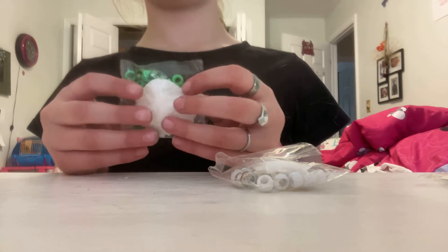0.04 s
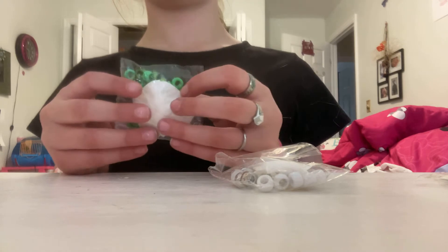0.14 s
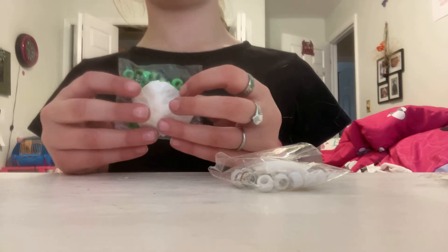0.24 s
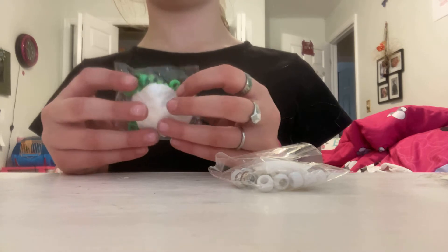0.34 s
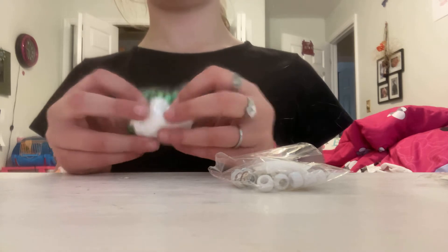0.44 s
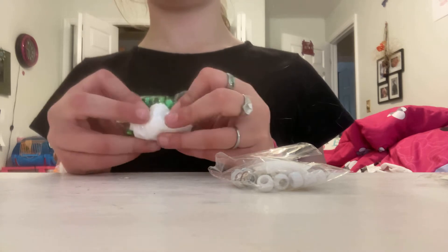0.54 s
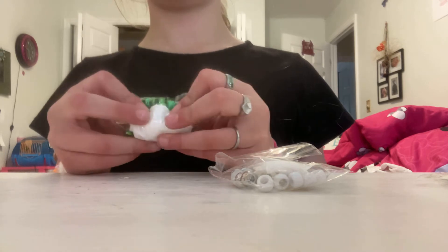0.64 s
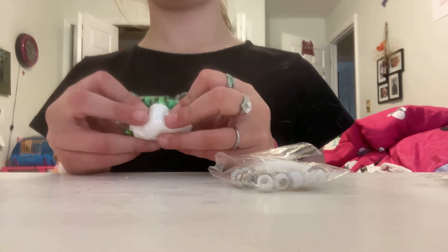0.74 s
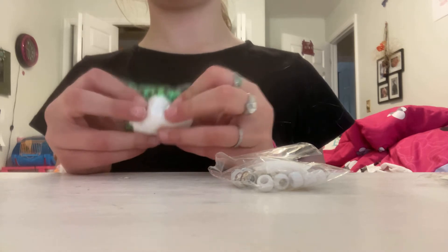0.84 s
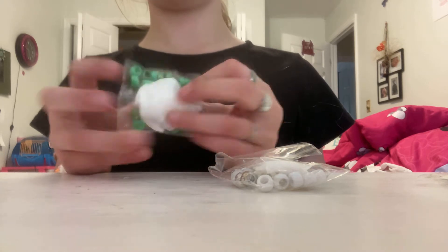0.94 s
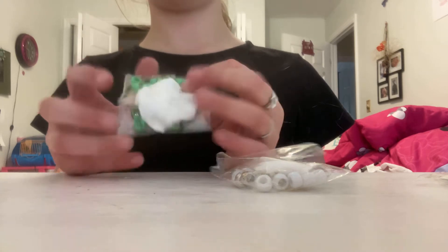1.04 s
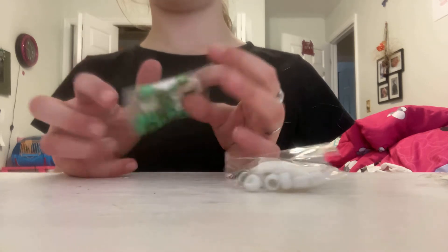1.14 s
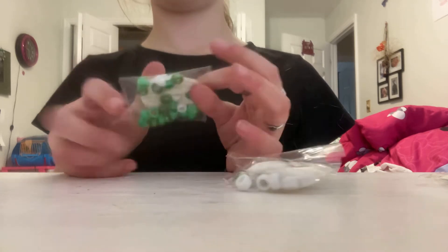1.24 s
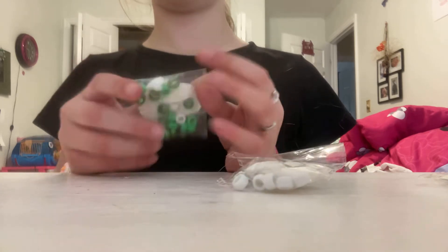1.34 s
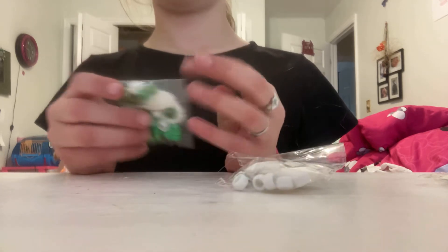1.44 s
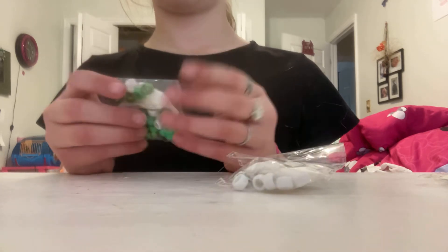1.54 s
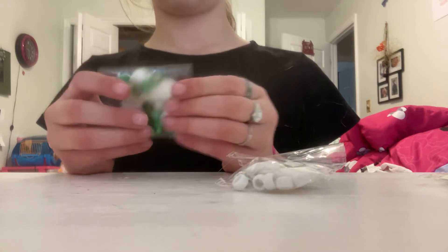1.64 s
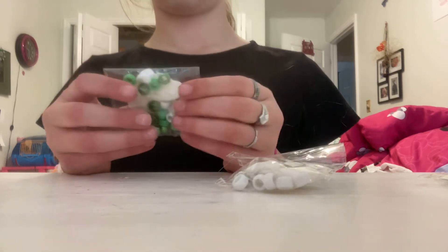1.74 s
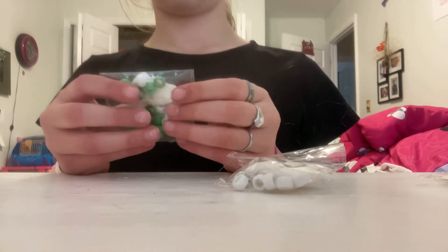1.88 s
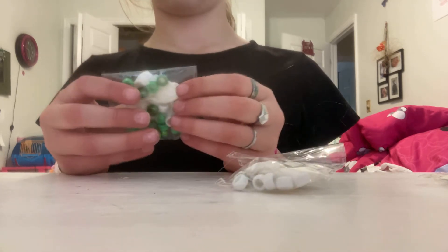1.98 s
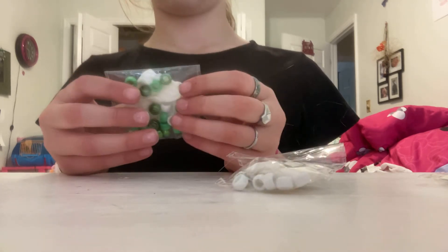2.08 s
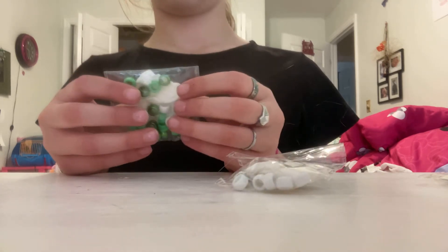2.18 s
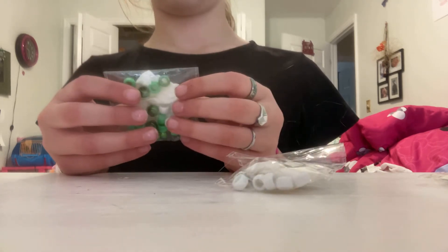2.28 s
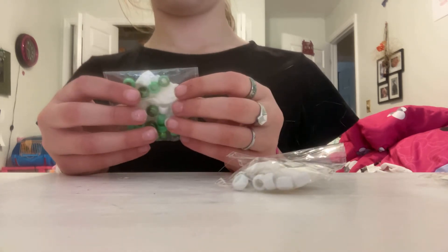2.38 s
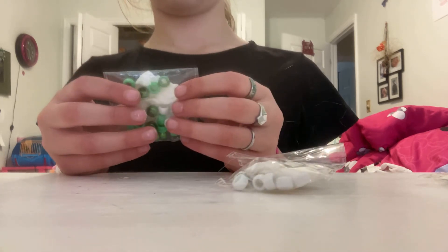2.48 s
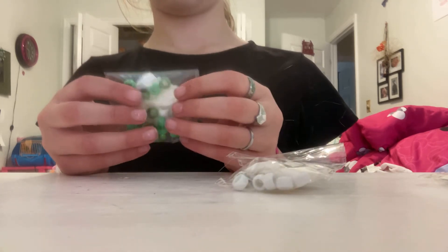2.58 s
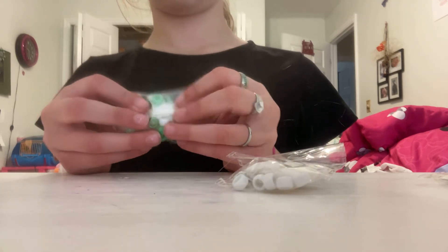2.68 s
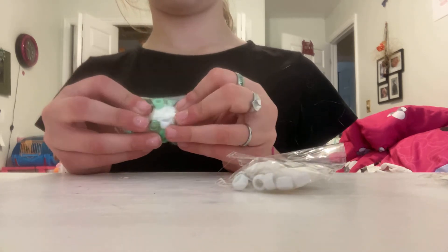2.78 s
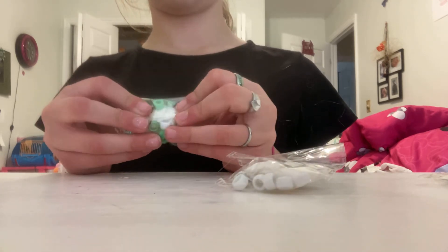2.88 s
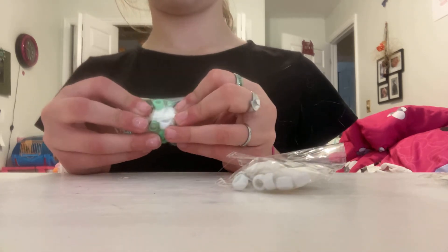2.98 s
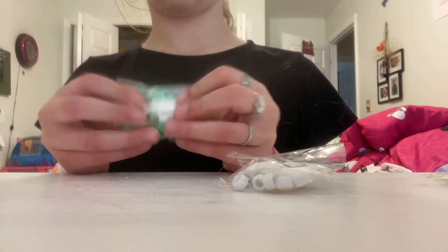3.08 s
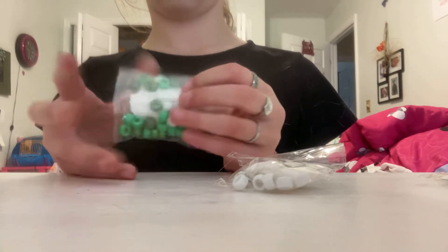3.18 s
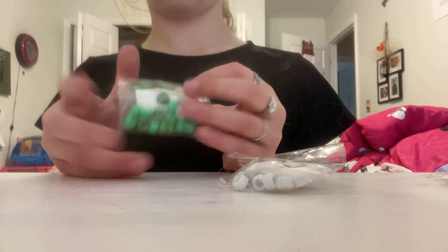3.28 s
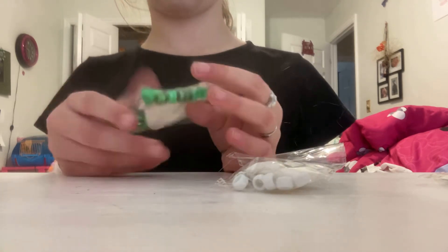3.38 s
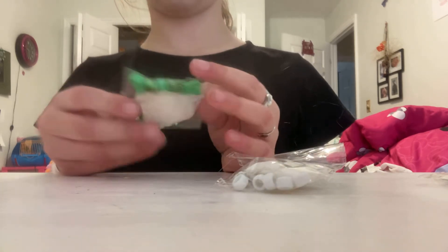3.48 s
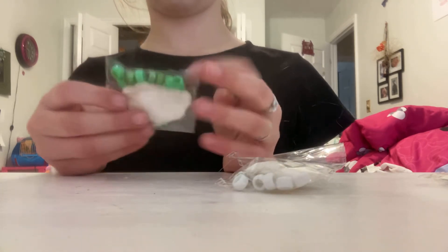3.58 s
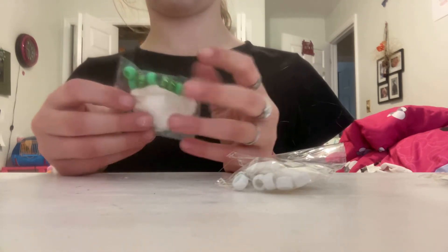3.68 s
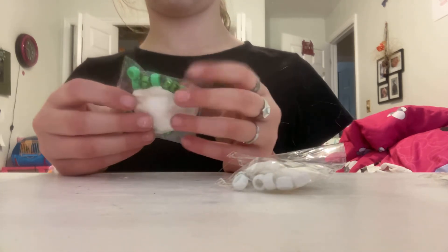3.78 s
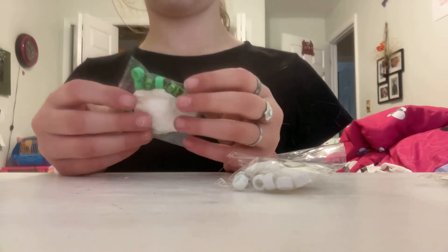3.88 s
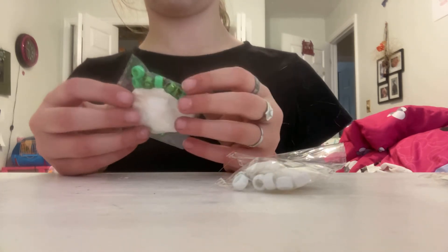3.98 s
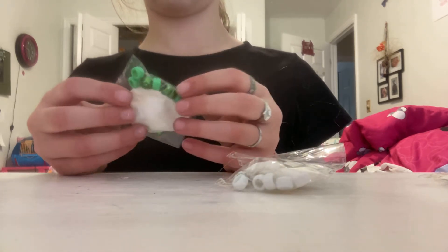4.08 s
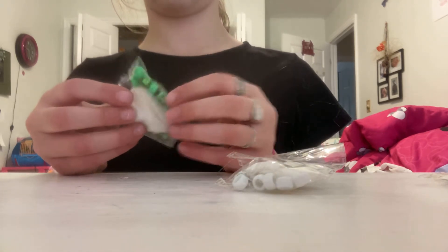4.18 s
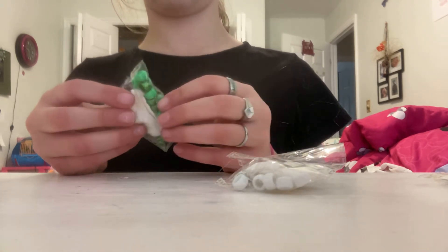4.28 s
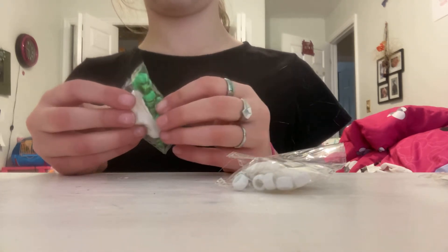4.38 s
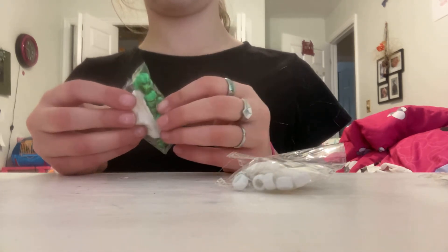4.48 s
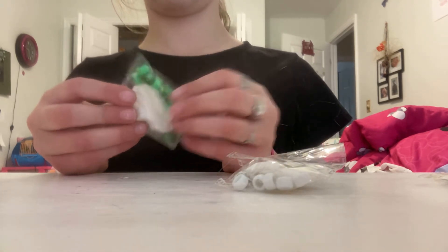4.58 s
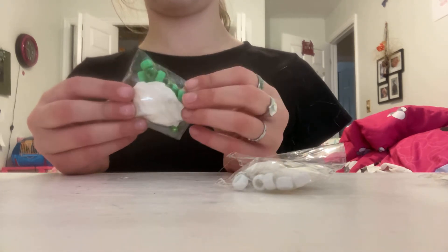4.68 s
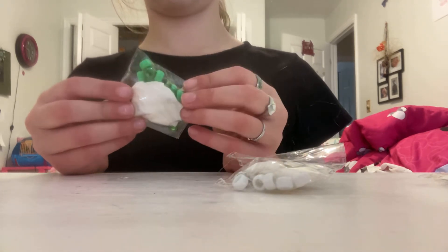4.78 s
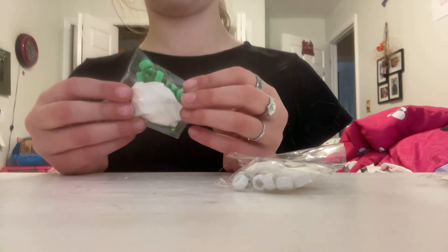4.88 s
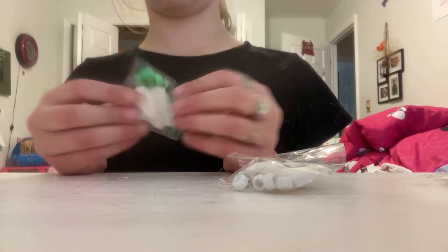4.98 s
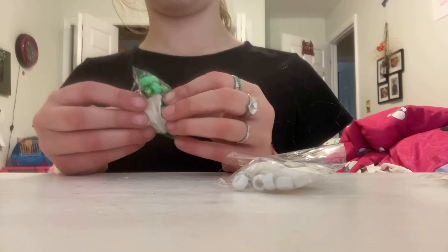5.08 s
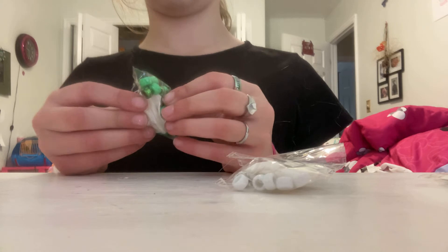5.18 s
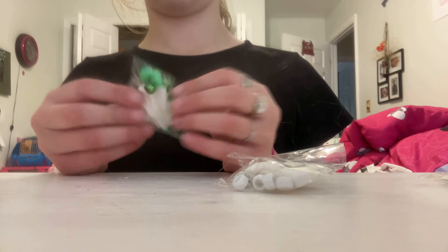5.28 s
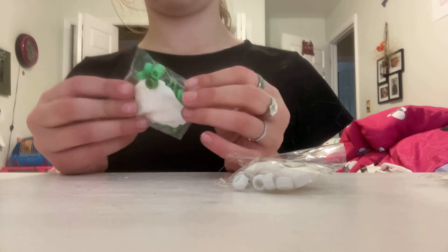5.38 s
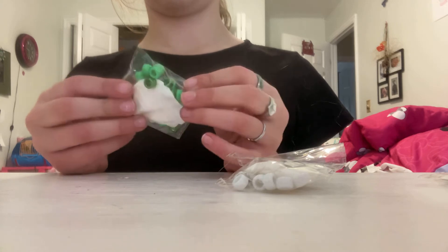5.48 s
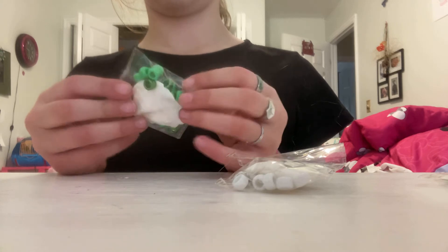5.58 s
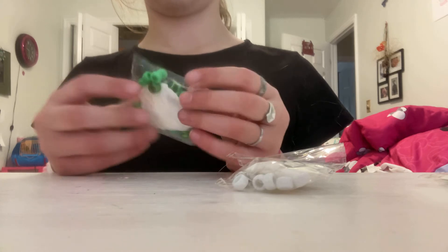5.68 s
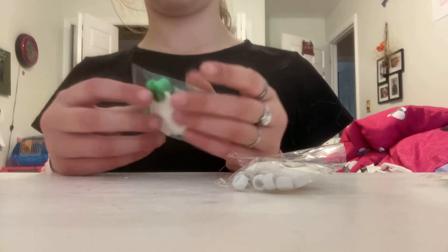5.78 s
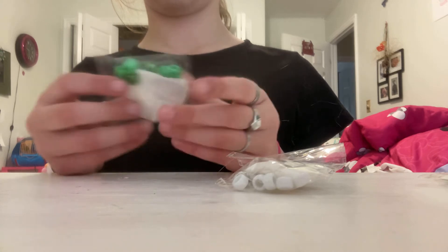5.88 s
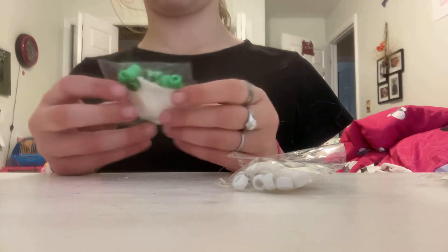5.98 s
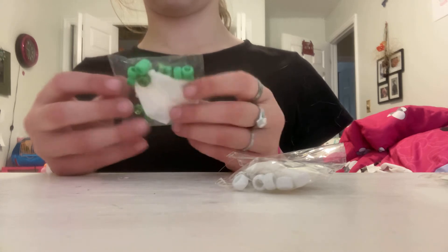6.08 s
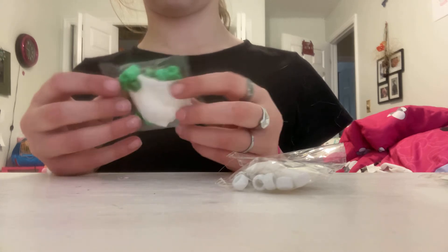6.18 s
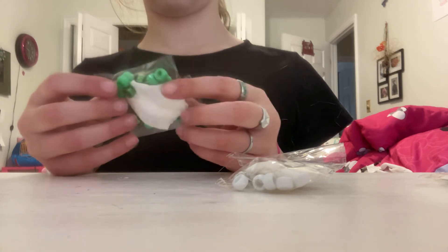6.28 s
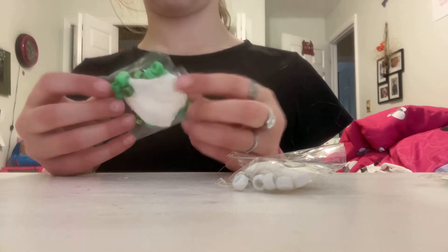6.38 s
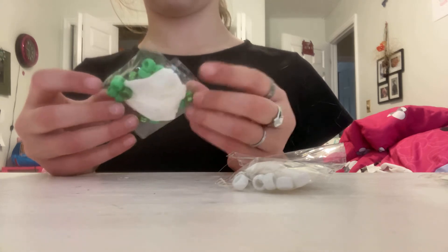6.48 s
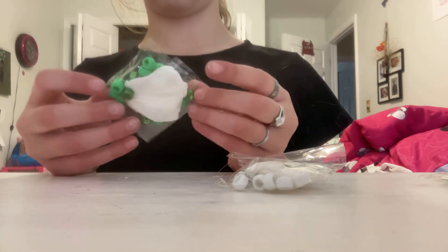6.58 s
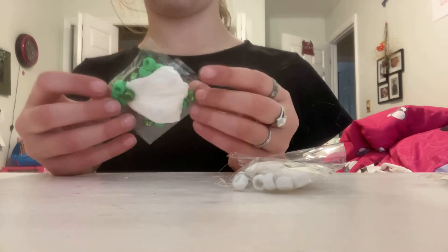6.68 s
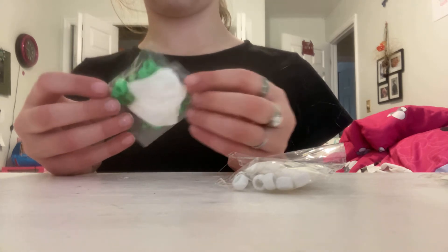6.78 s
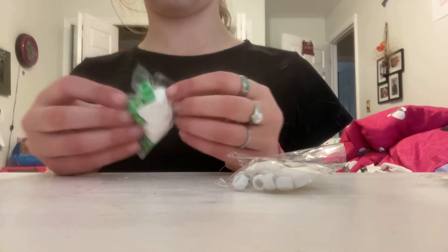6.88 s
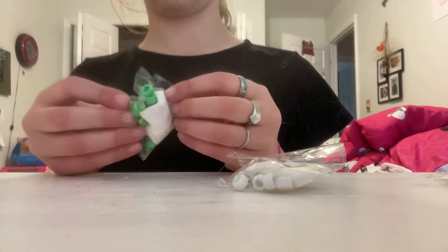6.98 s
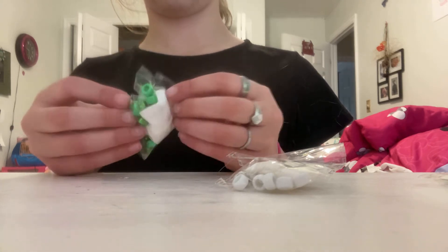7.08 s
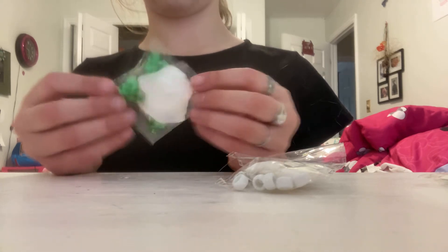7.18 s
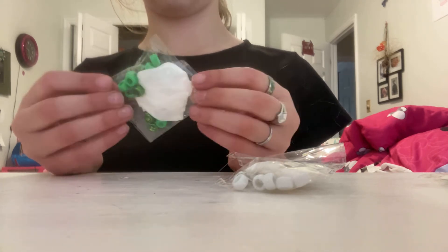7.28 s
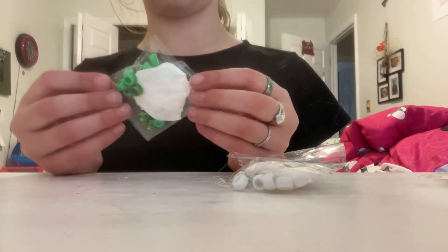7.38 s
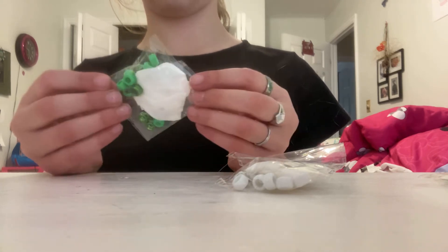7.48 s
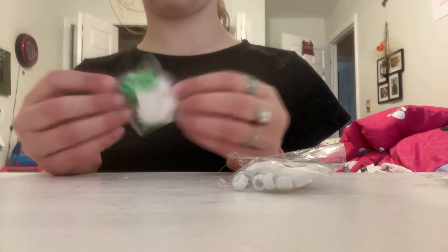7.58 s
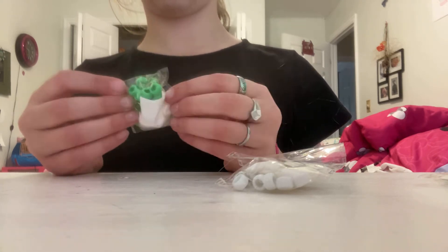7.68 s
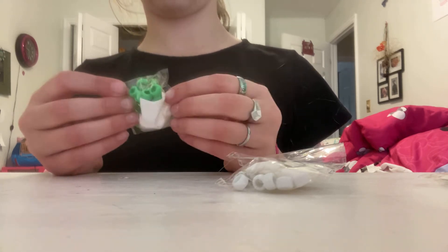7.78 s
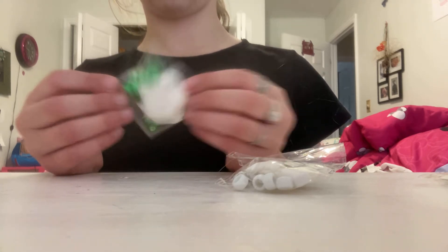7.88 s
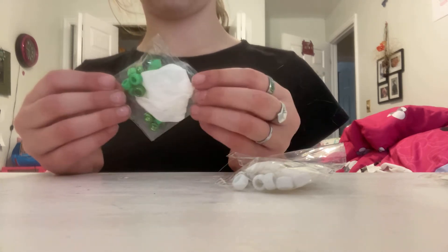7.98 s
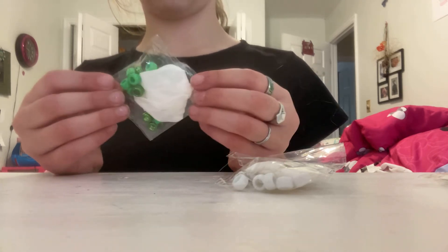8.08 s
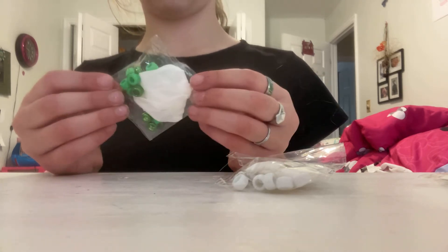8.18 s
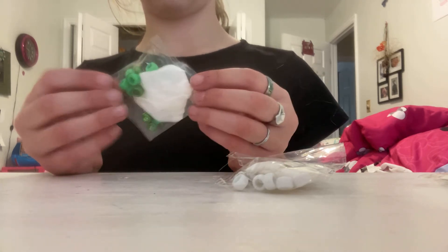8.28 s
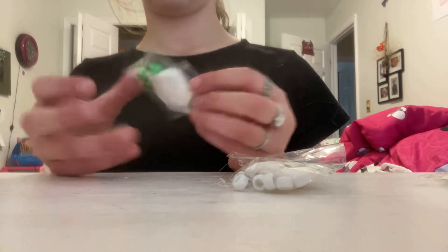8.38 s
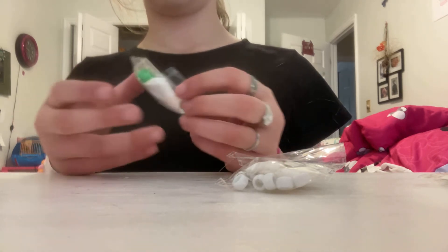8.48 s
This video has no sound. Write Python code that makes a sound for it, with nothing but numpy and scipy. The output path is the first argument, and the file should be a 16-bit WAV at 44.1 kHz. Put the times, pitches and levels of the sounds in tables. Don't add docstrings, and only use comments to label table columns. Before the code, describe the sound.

Irregular crinkling of a little plastic packet worked between two hands above a table. Each press builds quickly into a crunchy cluster of bright clicks, then drops away to stray creaks of film. Some creases sound dull and papery, others thin and crisp, and the air-filled pouch adds a slightly hollow body. Close microphone, small furnished room, low fan hum and soft steady hiss behind.

```python
import sys
import numpy as np
from scipy import signal
from scipy.io import wavfile
from scipy.ndimage import uniform_filter1d

SR = 44100
rng = np.random.default_rng(int(sys.argv[2]) if len(sys.argv) > 2 else 0)


def transcribe(u):
    v = np.clip(np.atleast_2d(u).T, -1, 1)
    q = np.round(v * 32767).astype(np.int16)
    wavfile.write(sys.argv[1], SR, q)


def ratio_of_db(decibels):
    return 10 ** (np.asarray(decibels, float) / 20)


N = 376658

# (lowest f/Hz, highest f/Hz, gain/dB, crackle share/dB)
POUCH = (467, 1493, 0, -6.5)
FILM = (2604, 6202, 0.5, -.5)
FOLDS = (5990, 15995, 3.5, -6.5)

# (t/s, film snap level/dB)
DULL_FLAT = [(0.0611, -14), (0.4888, -19.9), (0.8208, -17.5), (1.0036, -17), (1.2192, -21.5), (1.4412, -15),
             (1.4837, -19.5), (2.7032, -13), (3.7219, -24), (3.8779, -26.5), (3.9493, -36.8), (4.0453, -21),
             (4.499, -24.5), (5.1063, -35), (5.7007, -15.5), (5.8485, -24), (5.8629, -13), (6.0446, -20),
             (6.2301, -18), (6.3076, -18), (6.3202, -10), (6.5951, -25), (6.9092, -14), (7.2656, -16),
             (7.5142, -24.9), (7.5813, -8), (7.6075, -11), (7.7744, -32.5), (8.0366, -33.5),
             (8.1545, -30.5)]
# (t/s, film snap level/dB)
DULL_PUFFED = [(0.2174, -29), (1.5514, -22), (1.7202, -25), (1.77, -26.6), (3.0178, -45), (3.2357, -24.5),
               (3.5255, -19.5), (4.0655, -20.5), (4.1136, -14.5), (4.2549, -14.5), (4.4891, -40),
               (4.8956, -29), (5.3828, -14), (5.4956, -24), (5.5035, -36), (5.5864, -22.5), (5.9435, -29.5),
               (5.9714, -23), (6.0173, -19.5), (6.3451, -18), (6.4482, -17.5), (6.5513, -41), (6.5747, -24),
               (6.6088, -23), (6.6708, -21.5), (7.2188, -10.5), (7.3404, -11.5), (7.345, -17),
               (7.492, -34.5), (8.2837, -16.5)]
# (t/s, film snap level/dB)
PLAIN_FLAT = [(0.0833, -25.5), (0.1283, -31.5), (0.3509, -18), (0.9982, -15), (1.0784, -20), (1.1988, -32),
              (1.2885, -22.5), (1.3888, -17), (1.496, -17.5), (1.9612, -22.5), (1.978, -19.5),
              (1.9854, -18), (2.7338, -21), (2.7691, -20.5), (2.8597, -29.1), (2.8764, -23.5),
              (3.1986, -23.5), (4.266, -16), (4.3173, -19.5), (4.3964, -27), (4.7069, -15), (5.091, -23),
              (5.375, -21.1), (6.7588, -22), (6.889, -9.6), (6.9033, -18.5), (7.1044, -13), (7.6247, -10.5),
              (7.84, -19), (7.9693, -22)]
# (t/s, film snap level/dB)
PLAIN_PUFFED = [(1.2466, -25), (1.3098, -23), (1.9428, -27), (2.2897, -33.5), (2.483, -34), (2.5178, -36),
                (2.5585, -18), (2.6452, -13.9), (2.9104, -31.5), (3.0946, -9.5), (3.4105, -26),
                (3.589, -23), (3.7352, -22.5), (3.7922, -32), (4.1666, -9), (4.1727, -12.5), (4.5215, -23),
                (5.5452, -33.5), (5.5958, -32), (5.6573, -17.5), (6.2572, -27), (6.4021, -32),
                (6.4068, -34.1), (6.4764, -20.5), (7.1366, -14), (7.317, -19), (7.7153, -38),
                (7.9372, -17.5), (8.2941, -15), (8.4352, -18)]
# (t/s, film snap level/dB)
CRISP_FLAT = [(0.0367, -40), (0.5981, -23), (0.706, -35.5), (0.7884, -28.5), (1.0521, -19), (1.4087, -18.5),
              (1.472, -20), (1.9915, -27), (2.639, -13), (2.6821, -17), (2.9219, -26.5), (3.1767, -26),
              (4.1086, -15.5), (4.2735, -19), (4.296, -23.5), (4.3004, -23), (4.3486, -30), (4.3777, -31.5),
              (4.5472, -21), (4.9536, -19), (5.2377, -36), (5.8187, -20.1), (5.9827, -25.5), (6.7271, -27),
              (6.9782, -29), (7.6351, -19.5), (7.7581, -31), (7.8142, -34), (7.8207, -29.5), (7.8514, -14)]
# (t/s, film snap level/dB)
CRISP_PUFFED = [(0.5397, -30), (0.6226, -32.5), (1.6878, -29), (2.0997, -31), (2.5401, -21.5), (2.727, -28),
                (2.7554, -26), (3.0681, -13.5), (3.3537, -18), (3.5479, -28), (3.6146, -28),
                (3.9593, -31.5), (4.0217, -29), (4.1557, -11), (4.6566, -23), (5.2756, -23), (5.6967, -23),
                (5.7447, -19.5), (5.8039, -22.5), (6.1034, -19), (6.112, -21.5), (6.1933, -17),
                (6.4363, -19.7), (6.5414, -27), (6.7118, -30), (6.7219, -33.5), (6.8191, -31),
                (7.0957, -39), (7.418, -33.5), (8.416, -33.5)]
# (t/s, film snap level/dB)
CRUNCH = [(0.3766, -9), (0.428, -11), (0.447, -9.5), (0.46, -11.5), (0.4712, -22), (0.855, -14.5),
          (0.8819, -13.5), (0.9589, -18), (1.3816, -15), (2.5938, -9), (2.623, -12.5), (3.3464, -16),
          (4.198, -22), (4.6056, -10), (4.6175, -12), (4.6288, -5), (4.9783, -14), (4.9949, -5),
          (5.0138, -15.5), (5.3176, -23), (5.3292, -5), (5.68, -16), (6.1957, -19.5), (6.7734, -15),
          (6.7855, -14), (7.1837, -7), (7.5239, -14), (7.5661, -11), (7.8629, -21), (7.9, -5.5)]
# (rows, pouch level over film/dB, folds level over film/dB)
KINDS = [(DULL_FLAT, -15, -15), (DULL_PUFFED, -7, -17), (PLAIN_FLAT, -18, -4), (PLAIN_PUFFED, -3.5, -4.5),
         (CRISP_FLAT, -24, 4.5), (CRISP_PUFFED, -5, 2.9), (CRUNCH, -9.5, -6.5)]


def snaps():
    rows = [(*row, pouch, folds) for events, pouch, folds in KINDS for row in events]
    s, film_db, pouch_db, folds_db = np.transpose(rows)
    pouch_scatter_db, folds_scatter_db = rng.standard_normal((2, len(s))) * [[1.5], [2.5]]
    pouch_db = pouch_db + puff_db(s) + pouch_scatter_db
    return creases(s, film_db + 13, pouch_db, folds_db + folds_scatter_db)


def crackle(count=9000):
    hush_s, hush_db, light_db = 0.014, -5, -43
    place, chance, size = rng.random((count, 3)).T
    pouch, folds = np.clip(rng.standard_normal((count, 2)).T, -3, 1.7)
    s = place * N / SR
    pressure_db = pressure(s)
    share = np.clip(0.45 * ratio_of_db(0.45 * (pressure_db + 41)), 0.04, 1)
    size_db = 5.78 * np.minimum(-np.log(1 - size), 3.2)
    size_db -= 200 * (chance > share)
    film_db = pressure_db + 7 - 10 * np.log10(share) + size_db
    snap_s = np.sort([row[0] for rows, _, _ in KINDS for row in rows] + [np.inf])
    wait_s = snap_s[np.searchsorted(snap_s, s)] - s
    film_db += hush_db * (wait_s < hush_s) * (pressure_db < light_db)
    pouch_db = POUCH[3] + puff_db(s) + 5.08 * pouch - 0.2 * (pressure_db + 38)
    folds_db = FOLDS[3] + 7.8 * folds + 0.1 * (pressure_db + 35)
    return creases(s, film_db, pouch_db, folds_db)


def creases(s, film_db, pouch_db, folds_db, size=320):
    slip_times = (.9, .45, .32)
    ring_share, ring_ms = 0.8, 1.18
    ms = np.arange(size) * 1000 / SR
    jerks = rng.standard_normal((len(s), size + 1))
    length = np.exp(0.45 * jerks[:, :1])
    jerks = jerks[:, 1:] * np.sqrt(abs(jerks[:, :0:-1]))
    panel_hz = FILM[0] * (FILM[1] / FILM[0]) ** rng.random((len(s), 1))
    ring_fade = ms * np.exp(-2 * ms / (ring_ms * np.sqrt(length)))
    ring = np.sin(2 * np.pi * panel_hz * ms / 1000) * ring_fade
    out = np.zeros(N + size)
    for part, db, slip_ms in zip((POUCH, FILM, FOLDS), (pouch_db, 0, folds_db), slip_times):
        slip = ms / (slip_ms * length)
        settle = 0.05 * np.exp(-0.45 * slip)
        jolt = band(jerks * slip * (np.exp(-2 * slip) + settle), part)
        if part is FILM:
            jolt = jolt / np.linalg.norm(jolt, axis=1, keepdims=True)
            jolt += ring_share * ring / np.linalg.norm(ring, axis=1, keepdims=True)
        jolt *= ratio_of_db(film_db + db + part[2])[:, None] / np.linalg.norm(jolt, axis=1, keepdims=True)
        np.add.at(out, (s * SR).astype(int)[:, None] + np.arange(size), jolt)
    return out[:N]


def band(x, part):
    sos = signal.butter(2, part[:2], "bandpass", fs=SR, output="sos")
    return signal.sosfilt(sos, -x if part is FILM else x)


def pressure(s):
    # (t of most force/s, crackle level/dB, build/(dB/s), release/(dB/s))
    squeezes = [(0.082, -44, 700, 220), (0.373, -26, 997.5, 141), (0.869, -30.5, 298, 198),
                (0.968, -37, 300, 275), (1.13, -40, 133, 197), (1.3, -49, 28, 17), (1.378, -38, 393, 185),
                (1.8, -55.5, 300, 240), (1.968, -51.5, 325, 122), (2.589, -29.5, 1100, 142),
                (2.9, -60.5, 90, 100), (3.082, -26, 452, 258), (3.35, -37.5, 197, 153),
                (3.51, -40.5, 188, 128), (3.74, -56, 500, 119), (4.178, -30, 146, 370),
                (4.28, -44, 140, 136), (4.609, -24.5, 300, 227), (4.968, -24.5, 547, 345),
                (5.322, -22.5, 446, 345), (5.61, -35.5, 433, 63), (5.99, -43, 270, 190),
                (6.102, -34.5, 504, 277), (6.31, -44, 60, 125), (6.46, -50, 170, 62),
                (6.822, -26, 333, 170), (7.17, -25.5, 423, 157.5), (7.558, -25.5, 654, 237),
                (7.898, -30, 267, 217), (8.3, -37.5, 517, 100)]
    hold_s, rest_db = 0.0088, -69.5
    top_s, top_db, build, release = np.transpose(squeezes)[:, :, None]
    late = s - top_s
    building_db = -build * (late + hold_s)
    releasing_db = release * (late - hold_s)
    drop_db = np.maximum(np.maximum(building_db, releasing_db), 0)
    return np.maximum((top_db - drop_db).max(0), rest_db)


def puff_db(s):
    # (t/s, pouch level/dB)
    puff = [
        (0, -3),
        (1.5, -0.5),
        (2.6, -3),
        (3.5, -0.5),
        (4.5, -1),
        (5.7, 1.5),
        (6.5, -2),
        (7.4, 0.5),
        (8.5, 2),
    ]
    return np.interp(s, *np.transpose(puff))


def rustle():
    rub_levels = (-6, -12.5, -16)
    t = np.arange(N) / SR
    force_db = np.interp(t, t[::50], pressure(t[::50]))
    rub_db = 0.83 * (force_db + 30) - 30
    flicker = evened(uniform_filter1d(uniform_filter1d(rng.standard_normal(N), 150), 150))
    rub = ratio_of_db(rub_db + 4.3 * flicker) * rng.standard_normal(N)
    low = ratio_of_db(rub_levels[0] + puff_db(t)) * band(rub, POUCH)
    return low + ratio_of_db(rub_levels[1]) * band(rub, FILM) + ratio_of_db(rub_levels[2]) * band(rub, FOLDS)


def thumps():
    # (t/s, level/dB)
    nudges = [
        (0.883, -41),
        (4.271, -39.5),
        (8.438, -37),
    ]
    t, out = np.arange(1800) / SR, np.zeros(N)
    hz = 75 + 500 * np.exp(-t / 0.008)
    fade = signal.windows.tukey(len(t), 0.2) * np.exp(-t / 0.014)
    wave = np.sin(2 * np.pi * np.cumsum(hz) / SR) * fade
    for s, db in nudges:
        wobble = uniform_filter1d(uniform_filter1d(rng.standard_normal(len(t)), size=90), size=90)
        uneven = 0.5 + evened(wobble)
        out[round(s * SR):][:len(t)] += ratio_of_db(db + 6) * wave * uneven
    return out


def room(x):
    # (f/Hz, t60/s)
    decay_times = [(500, 0.12), (4000, 0.064), (14000, 0.11)]
    t = np.arange(SR // 4) / SR
    taps = rng.choice([-1.0, 1.0], len(t)) * (rng.random(len(t)) < 0.1) * (t > 0.003)
    hz, frames, z = signal.stft(taps, SR, nperseg=256)
    decay = ratio_of_db(-60 * frames / read(decay_times, hz)[:, None])
    tail = signal.istft(z * decay, SR, nperseg=256)[1][:len(t)]
    return signal.fftconvolve(x, ratio_of_db(-13.5) * tail / np.linalg.norm(tail))[:N]


def air():
    # (f/Hz, level per Hz/dB)
    hiss_colour = [(70, 0.5), (130, 0.5), (300, -10), (450, -14), (980, -12.5), (1900, -29.5), (4500, -28),
                   (8000, -28.5), (16000, -38)]
    # (f/Hz, width/Hz, level/dB)
    resonances = [(79, 33, -61), (133.7, 15.4, -59), (191, 6.7, -67), (255.2, 20.5, -60), (338, 9.3, -61),
                  (464, 18, -65)]
    out = ratio_of_db(-56.5) * evened(coloured(rng.standard_normal(N), hiss_colour))
    for hz, width, db in resonances:
        b, a = signal.iirpeak(hz, hz / width, SR)
        out += ratio_of_db(db) * evened(signal.lfilter(b, a, rng.standard_normal(N)))
    return out


def evened(x):
    return x / np.sqrt(np.mean(x ** 2) + 1e-20)


def read(points, hz):
    f, value = np.transpose(points)
    return np.interp(np.log(hz + 1), np.log(f + 1), value)


def coloured(x, points):
    hz = abs(np.fft.fftfreq(4096, 1 / SR))
    log_gain = np.log(ratio_of_db(read(points, hz)))
    taps = np.fft.ifft(np.exp(log_gain - 1j * signal.hilbert(log_gain).imag)).real[:2048]
    return signal.oaconvolve(x, taps)[:N]


def scene():
    # (f/Hz, gain/dB)
    cupped = [(120, 7), (300, -4), (900, 3), (1700, 1), (2350, -3.5), (2900, -2), (4400, 2.5), (7000, -6),
              (15000, -4.5)]
    bag = coloured(snaps() + crackle() + rustle(), cupped)
    return (bag + room(bag) + thumps() + air())[None]


def top_cut(x):
    return signal.sosfilt(signal.butter(12, 16990, fs=SR, output="sos"), x)


def record(dry):
    thin = signal.sosfilt(signal.butter(5, 52, "highpass", fs=SR, output="sos"), dry)
    edge = signal.firwin(127, 16100, window=("kaiser", 8), fs=SR)
    mix = signal.oaconvolve(np.tanh(thin), edge[None], "same")
    return top_cut(mix)


dry = scene()
out = record(dry)
transcribe(out)
```